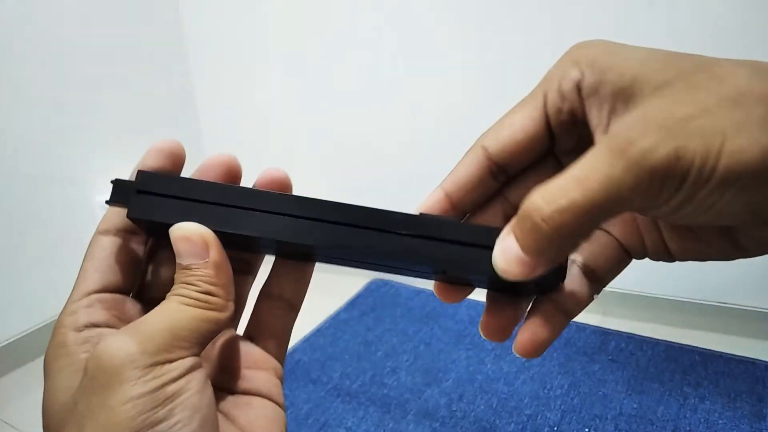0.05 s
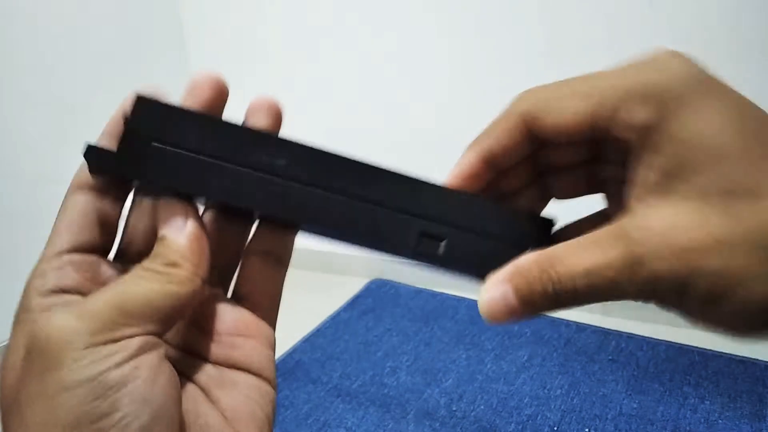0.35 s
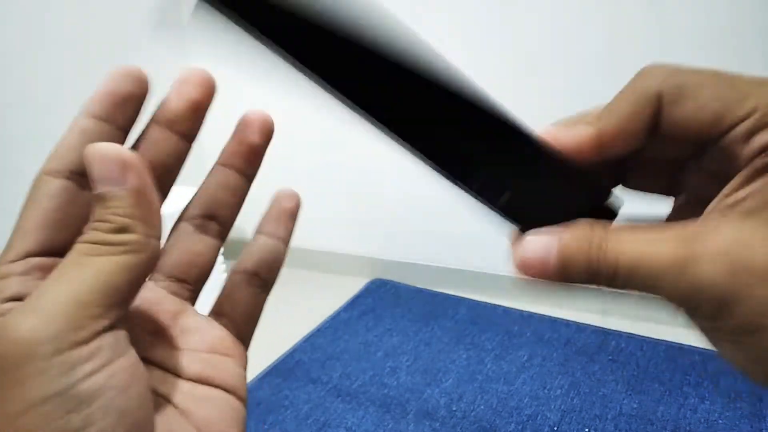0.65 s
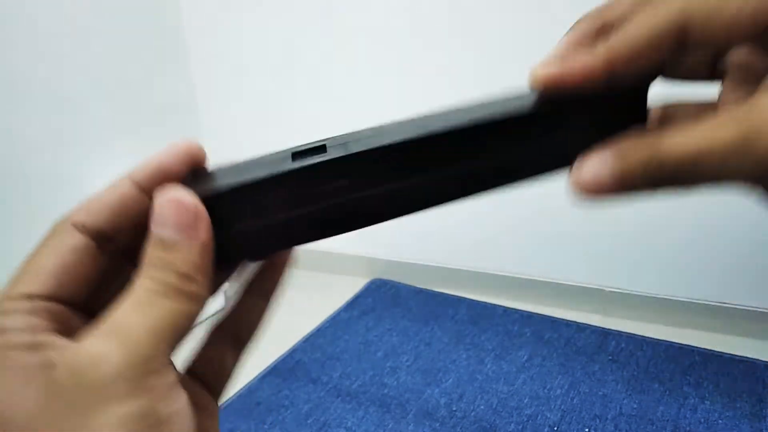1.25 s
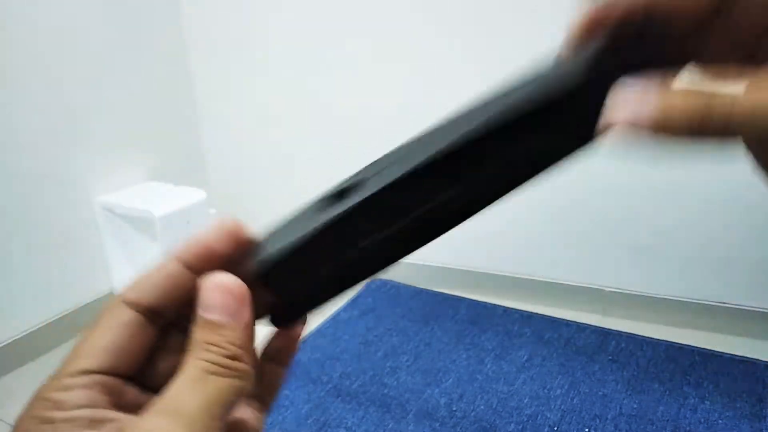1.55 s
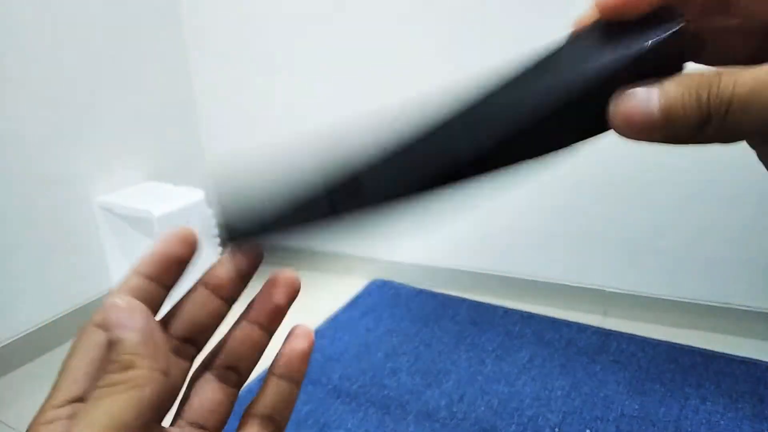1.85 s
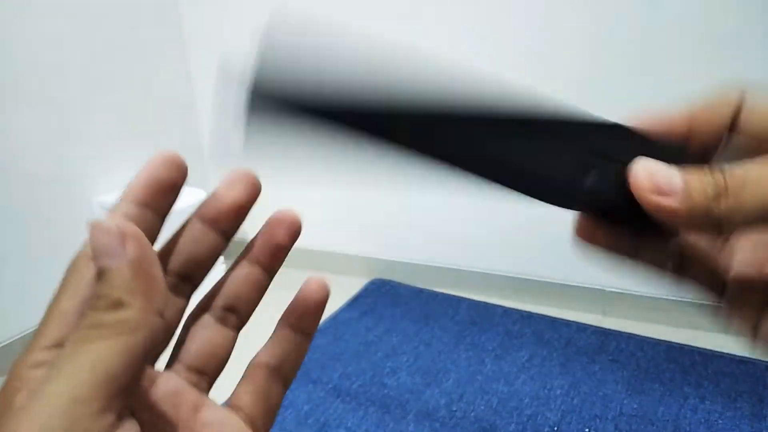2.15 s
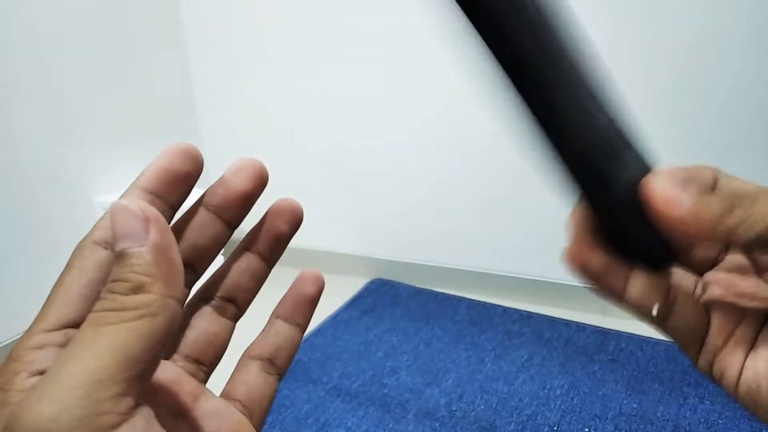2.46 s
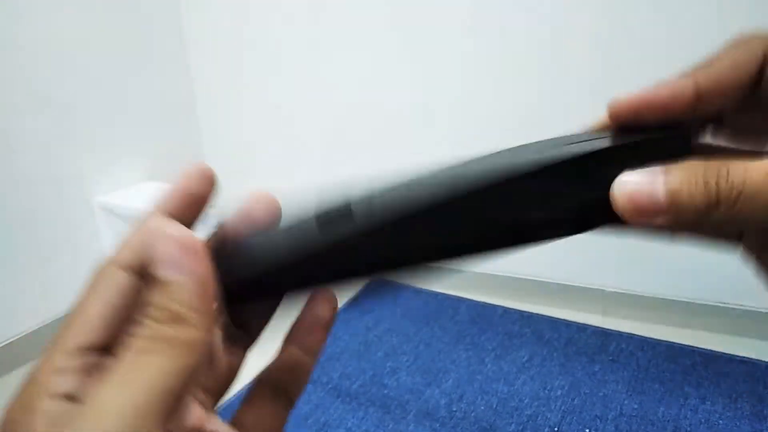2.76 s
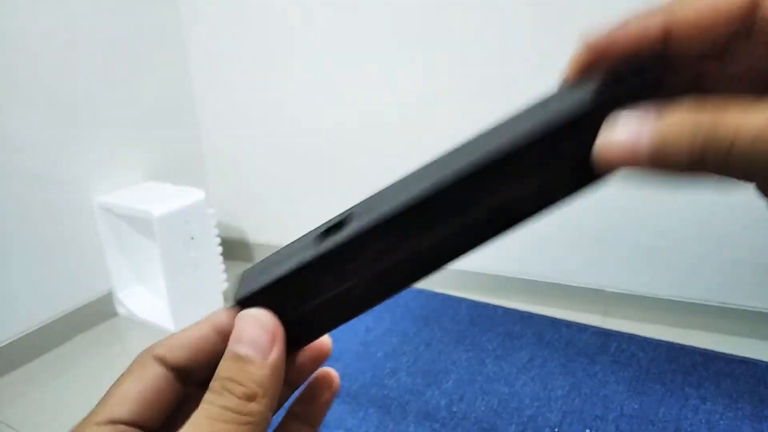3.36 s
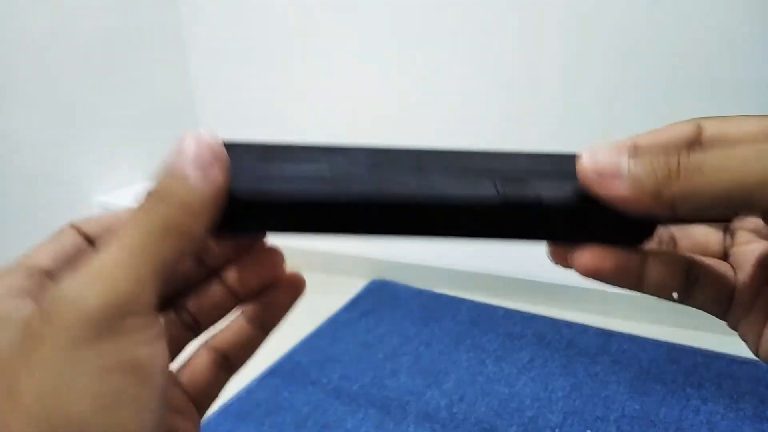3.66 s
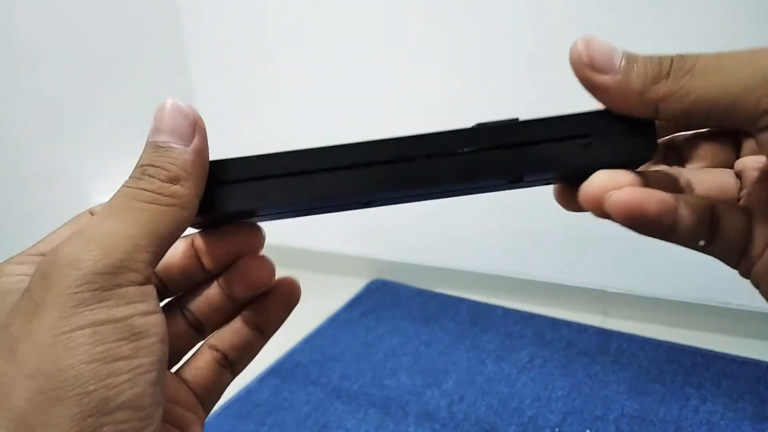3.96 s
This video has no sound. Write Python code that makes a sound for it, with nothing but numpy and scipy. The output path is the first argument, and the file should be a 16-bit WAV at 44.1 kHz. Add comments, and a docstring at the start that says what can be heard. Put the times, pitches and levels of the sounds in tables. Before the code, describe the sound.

Small hard pellets rattle and slide inside a hollow plastic case shaken back and forth.

```python
"""A low hum and two faint clicks come first, then small hard pellets start to roll and rattle close by.
They are in a long hollow plastic case that two hands tilt and shake, and the heap surges with every tilt.
Each contact ticks and makes the case ring; some hit a hollow spot or thump the wall.
A small tiled room adds a short echo."""
import sys
import numpy as np
from scipy import signal
from scipy.fft import rfft, irfft, next_fast_len
from scipy.io import wavfile
from scipy.ndimage import map_coordinates

SR = 44100
rng = np.random.default_rng(int(sys.argv[2]) if len(sys.argv) > 2 else 0)


def materialize(psi):
    """Save the field psi as 16-bit PCM at rate SR to the path in sys.argv[1].

    A 1-D psi becomes a single channel; in a 2-D psi each row is a channel.
    """
    bounded = np.clip(np.atleast_2d(psi).T, -1, 1)
    quanta = np.round(bounded * 32767).astype(np.int16)
    wavfile.write(sys.argv[1], SR, quanta)


N = 176400

# Levels in the tables are relative: gains and filters act on them later.
# tone of the room's soft noise (frequency [Hz], level [dB])
AIR_TONE = [(20, -37), (55, -22.5), (100, -22), (160, -14.5), (230, -9), (320, -6), (420, -16), (490, -11),
            (650, -17.5), (800, -12), (1100, -16.5), (2500, -19), (3700, -23), (5000, -37), (7400, -36),
            (8200, -31), (10000, -29), (14000, -43)]
# how alike that noise is left and right (frequency [Hz], likeness [0 to 1])
AIR_LIKENESS = [(50, 0.26), (150, 0.51), (300, 1), (550, 0.24), (6000, 0.046)]
# notes of the hum (frequency [Hz], level [dB])
HUM_NOTES = [(145, -73.5), (186, -73), (202, -66.5), (303, -64.5), (320, -69.5), (354, -66), (372, -70.5)]
# how long the echo takes to fade by 60 dB (frequency [Hz], time [s])
ECHO_FADE = [(300, 0.11), (3000, 0.39), (8000, 0.41), (14000, 0.15)]
# how much louder the left side is than the right (frequency [Hz], level [dB])
LEFT_OVER_RIGHT = [(60, 1.5), (200, 5), (350, 6.5), (550, -1.5), (1300, 0), (6000, 0), (9000, -3.5),
                   (13000, 4.5)]

# how hard the heap runs (time [s], level [dB])
HEAP_FLOW = [(0.47, -46), (0.51, -30), (0.56, -47), (0.67, -47.5), (0.69, -37.5), (0.74, -27), (0.79, -37),
             (0.87, -23.5), (0.94, -36.5), (1.01, -29), (1.1, -43), (1.2, -42), (1.25, -50.5), (1.29, -38),
             (1.39, -42.5), (1.41, -34.5), (1.49, -44.5), (1.52, -33), (1.61, -35), (1.83, -23.5),
             (1.89, -30.5), (1.91, -23.5), (2.07, -31), (2.11, -24), (2.2, -33.5), (2.26, -29), (2.45, -36),
             (2.52, -30.5), (2.56, -41), (2.66, -33.5), (2.7, -37.5), (2.86, -42), (2.94, -42.5),
             (2.97, -27.5), (3.23, -25.5), (3.32, -34), (3.36, -21), (3.43, -32.5), (3.52, -25),
             (3.59, -32.5), (3.65, -23.5), (3.73, -36.5), (3.77, -26), (3.9, -49), (4.0, -46)]
# a bunch of pellets slides and lands together (time [s], level [dB])
SLIDES = [(1.63, -28), (1.684, -23), (1.765, -21.5), (1.807, -23), (1.83, -22.5), (1.915, -19.5),
          (1.936, -24), (1.979, -22.5), (2.501, -30), (2.654, -25.5), (2.782, -32), (2.985, -26),
          (3.506, -24.5), (3.644, -22.5)]
# the heap stirs, then lets go (time [s], level [dB])
HEAP_START = [(.38, -37), (.42, -3), (.483, -30), (.492, 4.5), (.506, 1.5)]
# extra hollow ring from where the heap lies in the case (time [s], level [dB])
EXTRA_RING = [(.5, -1.5), (.86, 1.5), (2.1, 0.5), (2.48, 5), (2.76, 1.5), (2.95, 1), (3.7, -0.5)]
# tone of a pellet's tick (frequency [Hz], level [dB])
TICK_TONE = [(500, -50), (2500, -16), (4500, -1.5), (5600, -3), (7300, -4), (7900, 2.5), (9300, 3),
             (11000, 2), (14000, -4), (16000, -63)]
# tone of the case's hollow ring (frequency [Hz], level [dB])
HOLLOW_TONE = [(400, -46.5), (2000, -1.5), (2800, -7), (3450, 1), (3850, 12.5), (4350, 1), (5500, -1),
               (9000, -35.5)]
# tone of the case's walls (frequency [Hz], level [dB])
WALL_TONE = [(20, -60), (300, -44), (750, -23), (1050, -13), (1210, 3), (1380, -4), (1900, 3.5),
             (2500, -13), (4500, -48.5)]
# notes the long case rings at (frequency [Hz], width [Hz], level [dB])
TUBE_NOTES = [(3220, 90, -7.5), (3510, 70, 5), (4620, 150, -7), (5560, 110, -12)]

# single sharp hits (time [s], level [dB])
CLICKS = [(0.15, -42.5), (0.3106, -45), (0.491, -35), (0.5062, -19.5), (0.6, -30), (0.6899, -20),
          (0.702, -21), (0.7385, -16), (0.7488, -12), (0.8636, -15.5), (0.8834, -23), (1.039, -24),
          (1.062, -33), (1.126, -23.5), (1.1438, -21.5), (1.1623, -16.5), (1.1965, -17), (1.285, -20.5),
          (1.3392, -24.5), (1.35, -32), (1.4045, -23.5), (1.418, -24.5), (1.558, -22), (1.7769, -14.5),
          (2.049, -18.5), (2.241, -19), (2.3305, -18.5), (2.846, -23), (2.9583, -18.5), (3.0763, -18.5),
          (3.1453, -16.5), (3.1988, -14.5), (3.2444, -16.5), (3.2978, -18), (3.3445, -15), (3.359, -17),
          (3.486, -15.5), (3.7524, -18)]
# their tone (frequency [Hz], level [dB])
CLICK_TONE = [(700, -44), (2000, -12), (3800, -1.5), (7000, -4.5), (8200, 5), (10500, 0.5), (14000, -7.5),
              (16000, -40)]
# one pellet strikes the bare wall with a dry snap (time [s], level [dB])
SNAPS = [(.8215, -11), (.9645, -13), (1.1995, -19.5), (1.3028, -18.5), (2.254, -19), (2.848, -18)]
# its tone (frequency [Hz], level [dB])
SNAP_TONE = [(500, -25.5), (1900, -3), (9000, 5), (15000, -1)]
# hits on a hollow spot (time [s], level [dB])
KNOCKS = [(2.453, -25), (2.468, -25), (2.516, -24), (2.5875, -15), (2.597, -26), (2.61, -27),
          (2.652, -31.5), (2.729, -21.5), (2.737, -23), (3.163, -23)]
# their tone (frequency [Hz], level [dB])
KNOCK_TONE = [(1200, -23.5), (2700, -17), (3400, 5.5), (3850, 6.5), (4500, -10.5), (9000, -18.5)]
# hard clacks of the whole shell (time [s], level [dB])
CLACKS = [(.829, -17.5), (.842, -21), (.851, -35), (.9645, -22), (1.917, -23), (3.591, -19), (3.599, -19),
          (3.607, -23), (3.760, -23)]
# their tone (frequency [Hz], level [dB])
CLACK_TONE = [(300, -73), (1300, -8.5), (1900, 4.5), (2700, 3), (4500, -1.5), (9000, -22)]
# the heap lands on the wall (time [s], level [dB])
THUMPS = [(.7305, -27.5), (2.256, -32), (3.602, -35)]
# its tone (frequency [Hz], level [dB])
THUMP_TONE = [(20, -70.5), (130, -24), (250, -0.5), (600, -4), (950, -3), (1200, 11), (1450, -3),
              (2500, -2.5), (6000, -24)]


def amp(db):
    """Turn decibels into a number to multiply by."""
    return 10 ** (np.asarray(db) / 20)


def fade(t, fade_s):
    """Die away by 60 dB every fade_s seconds."""
    return amp(-60 * t / fade_s)


def unit(x):
    """Scale to an average power of 1."""
    return x / np.sqrt(np.mean(x ** 2) + 1e-20)


def along(points, hz):
    """Read between (frequency, value) points, spaced by pitch."""
    freqs, values = np.transpose(points)
    return np.interp(np.log(hz + 1), np.log(freqs + 1), values)


def curve(rows):
    """Join (time, value) points into one value per sample."""
    return np.interp(np.arange(N) / SR, *np.transpose(rows))


def wobble(rate):
    """A smooth curve through rate random points a second."""
    return map_coordinates(rng.standard_normal(int(N * rate / SR) + 4), [np.arange(N) * rate / SR])


def filtered(x, response):
    """Multiply each frequency in x by response(hz)."""
    size = 2 * next_fast_len(N)
    return irfft(rfft(x, size) * response(np.fft.rfftfreq(size, 1 / SR)), size)[..., :N]


def colour(tone):
    """A filter with this tone and an average power of 1."""
    def response(hz):
        cepstrum = irfft(np.log(amp(along(tone, hz))))
        half = len(cepstrum) // 2
        cepstrum[1:half] *= 2  # fold it so the ring comes after a hit, never before
        cepstrum[half + 1:] = 0
        gain = np.exp(rfft(cepstrum))
        return gain / np.sqrt(np.mean(abs(gain) ** 2))
    return response


def room_noise(level_db=-54):
    """Soft noise, most alike left and right in the bass."""
    def response(hz):
        spread = np.arccos(np.clip(along(AIR_LIKENESS, hz), -1, 1)) / 2
        return amp(along(AIR_TONE, hz)) * [np.cos(spread), np.sin(spread)]
    mid, side = filtered(rng.standard_normal((2, N)), response)
    return amp(level_db) * unit(np.array([mid + side, mid - side]))


def hum(waver=0.19, drift_rad=1.0):
    """Low notes that waver a little, like a fan."""
    t = np.arange(N) / SR
    out = np.zeros(N)
    for hz, db in HUM_NOTES:
        strength = np.sqrt(2) * amp(db) * (1 + waver * wobble(6.81))
        out += strength * np.sin(2 * np.pi * hz * t + drift_rad * wobble(7))
    return out


def echoes(early_db=-4, tail_db=-5):
    """Echoes for one position of the case: hands and floor at once, then the walls' short tail."""
    hz, t, bands = signal.stft(rng.standard_normal((2, SR // 2)), SR, nperseg=256)
    tail = signal.istft(bands * fade(t, along(ECHO_FADE, hz)[:, None]), SR, nperseg=256)[1]
    t = np.arange(tail.shape[1]) / SR
    tail *= 1 - np.exp(-t / 0.001)
    early = rng.standard_normal(tail.shape) * fade(t, .05)
    return amp(tail_db) * tail / np.linalg.norm(tail[0]) + amp(early_db) * early / np.linalg.norm(early[0])


def room_echo(x, positions=32):
    """The case keeps moving, so its echoes keep changing."""
    out = np.zeros((2, N + SR))
    for part in np.array_split(np.arange(N), positions):
        piece = x[:, part] * signal.windows.tukey(len(part), .02)
        echo = signal.fftconvolve(piece, echoes(), axes=1)
        out[:, part[0]:][:, :echo.shape[1]] += echo
    return out[:, :N]


def tube(hz):
    """The long case as a filter: it rings at a few narrow notes."""
    gain = sum(amp(db) * 1j * hz * width / (centre ** 2 - hz ** 2 + 1j * hz * width)
               for centre, width, db in TUBE_NOTES)
    return gain / np.sqrt(np.mean(abs(gain) ** 2))


def contact(fade_s, shared=0.46):
    """One contact: a tiny burst of fading noise, partly shared by left and right."""
    t = np.arange(SR // 25) / SR
    noise = rng.standard_normal((3, len(t))) * fade(t, fade_s)
    burst = noise[:2] + shared * noise[2]
    return burst / np.sqrt(np.sum(burst ** 2, axis=1, keepdims=True))


def hits(rows, tone, gain_db, fade_s):
    """A fresh contact for each (time, level) row, all with the same tone."""
    out = np.zeros((2, N + SR))
    for start, db in rows:
        burst = amp(db) * contact(fade_s)
        out[:, int(start * SR):][:, :burst.shape[1]] += burst
    return amp(gain_db) * filtered(out[:, :N], colour(tone))


def clumps(rows, count=3, lag_s=0.0027, scatter_s=.002, lighter_db=-4.5):
    """Each hard hit, plus the lighter pellets that land around it."""
    lighter = [(start + lag_s + scatter_s * chance, db + lighter_db)
               for start, db in rows for chance in rng.standard_normal(count)]
    return list(rows) + lighter


def hard_hits():
    """The hardest contacts with the case, which stand out from the rattle."""
    return (hits(clumps(CLICKS), CLICK_TONE, gain_db=13, fade_s=0.0026)
            + hits(SNAPS, SNAP_TONE, gain_db=16.5, fade_s=.005)
            + hits(KNOCKS, KNOCK_TONE, gain_db=19.5, fade_s=0.012)
            + hits(CLACKS, CLACK_TONE, gain_db=14.5, fade_s=.035)
            + hits(THUMPS, THUMP_TONE, gain_db=20, fade_s=0.012))


def patter(per_s, scatter_db=4.3, shell_db=-3.5, ping_hz=3635, ping_spread=0.13):
    """Many small contacts at random times: their ticks, and the short notes they ring."""
    starts = np.flatnonzero(rng.random(N) < per_s / SR)
    size, spot = rng.standard_normal((len(starts), 2)).T
    strength = amp(scatter_db * np.minimum(size, 2))[:, None]
    strength /= np.sqrt(per_s[starts, None])  # busier does not mean louder here
    t = np.arange(SR // 80) / SR  # each tick and note is cut off after this span
    samples = (starts[:, None] + np.arange(len(t))).ravel()

    def mix(sounds):
        """Add up one short sound per contact."""
        return unit(np.bincount(samples, (strength * sounds).ravel(), N + len(t))[:N])

    ticks = [mix(rng.standard_normal((len(starts), len(t))) * fade(t, 0.0045)) for _ in range(2)]
    push = rng.choice([-1, 1], (len(starts), 1))
    # all contacts share one part of the shell's ring
    shell = [mix(push * ring[:len(t)]) for ring in contact(fade_s=0.0084)]
    # each spot on the shell has its own note
    note_hz = ping_hz * np.exp(ping_spread * np.clip(spot, -2, 2))
    notes = np.sin(2 * np.pi * note_hz[:, None] * t) * fade(t, 0.074)
    pings = [mix(notes * rng.standard_normal((len(starts), 1))) for _ in range(2)]
    return unit(np.array(ticks) + amp(shell_db) * np.array(shell)), np.array(pings)


def rolling_heap(idle_per_s=140, extra_per_s=700, half_slide_s=.007):
    """The heap runs and slides: more flow brings more and harder contacts, which tick and ring the case."""
    t = np.arange(N) / SR
    slide_power = sum(amp(db) ** 2 * np.exp(-((t - when) / half_slide_s) ** 2) for when, db in SLIDES)
    flow = np.sqrt(amp(curve(HEAP_FLOW)) ** 2 + slide_power)
    contacts, pings = patter(idle_per_s + extra_per_s * np.sqrt(flow / flow.max()))
    jostle = amp(np.clip(wobble(38), -2, 1))  # the heap moves in small slides
    body = flow ** 0.66  # the ring grows less than the ticks, so harder contacts are brighter
    drive = body * amp(curve(EXTRA_RING))
    ticks = filtered(contacts * flow * amp(-0.5), colour(TICK_TONE))
    ring = filtered(contacts * drive, lambda hz: amp(-21.5) * colour(HOLLOW_TONE)(hz) + amp(-26) * tube(hz))
    notes = pings * drive * amp(-22.5)
    wall = filtered(contacts * body * amp(-28), colour(WALL_TONE))
    return amp(curve(HEAP_START)) * jostle * (ticks + ring + notes + wall)


def scene(lowest_hz=121):
    """The rattling case in its room, with a slightly different tone left and right."""
    rattle = rolling_heap() + hard_hits()
    # a small case gives off little deep bass
    case = filtered(rattle, lambda hz: (1j * hz / (lowest_hz + 1j * hz)) ** 2)
    together = case + room_echo(case) + room_noise() + hum()
    sides = np.array([[.5], [-.5]])
    return filtered(together, lambda hz: amp(sides * along(LEFT_OVER_RIGHT, hz)))


def record(dry, top_hz=14400):
    """Cut off the very highest treble."""
    return filtered(dry, lambda hz: 1 / np.sqrt(1 + (hz / top_hz) ** 160))


dry = scene()
out = record(dry)
materialize(out)
```